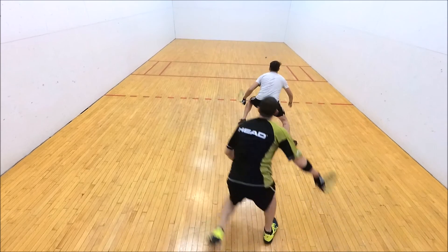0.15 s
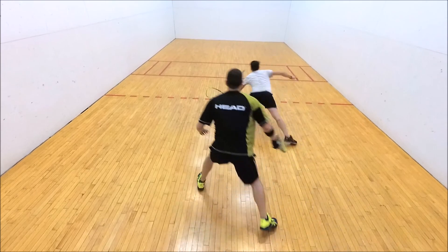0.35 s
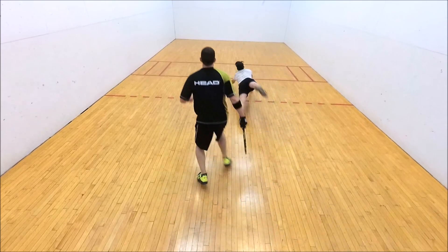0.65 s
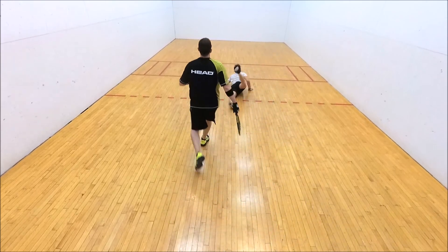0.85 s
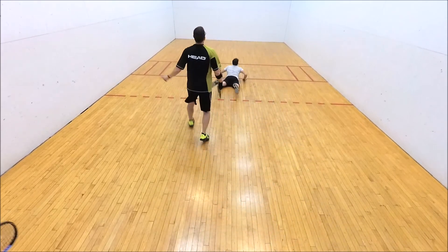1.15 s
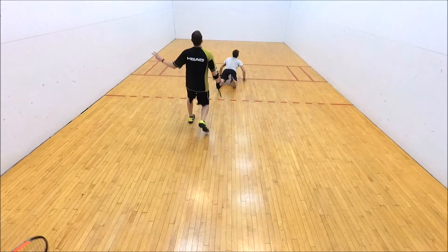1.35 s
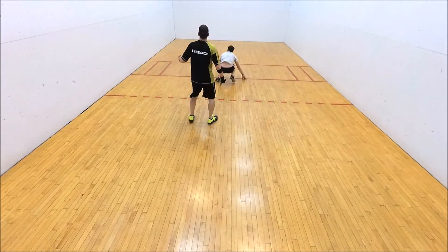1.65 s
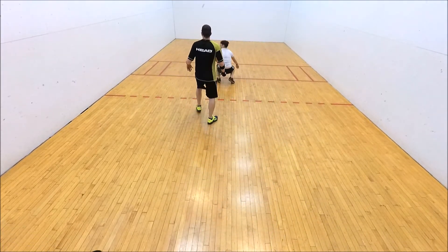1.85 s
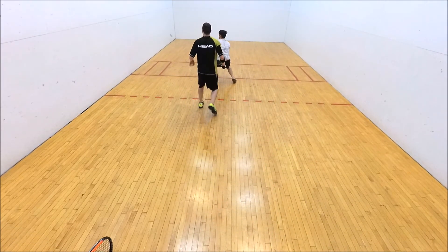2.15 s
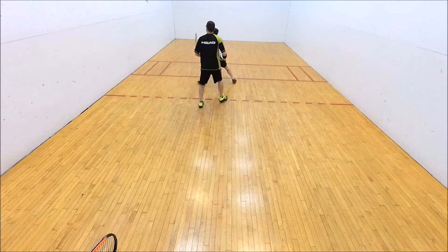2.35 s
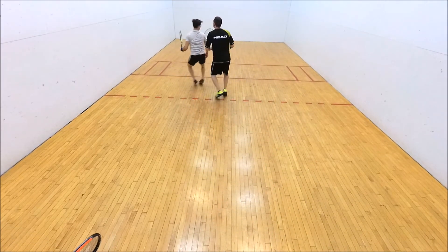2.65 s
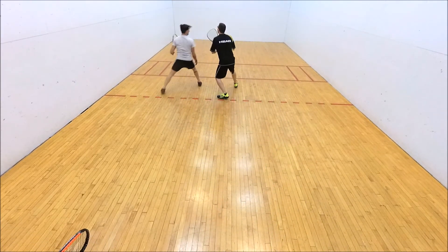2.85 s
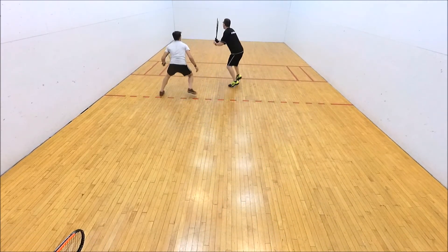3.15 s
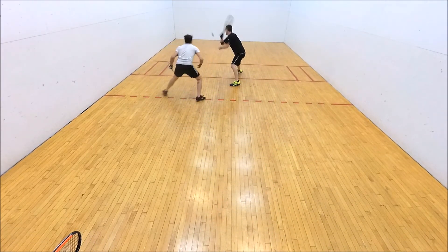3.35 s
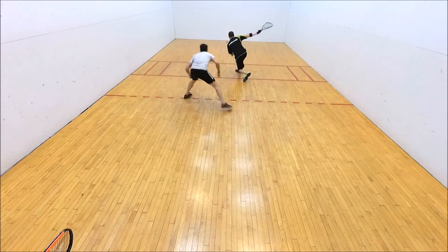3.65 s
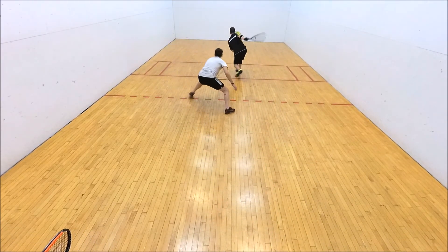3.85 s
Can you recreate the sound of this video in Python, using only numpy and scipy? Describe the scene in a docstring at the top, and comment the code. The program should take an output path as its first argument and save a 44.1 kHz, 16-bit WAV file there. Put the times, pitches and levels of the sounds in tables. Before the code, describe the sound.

A racquetball smacks off racquets and walls in an echoing court as shoes thump and scuff.

```python
"""A bare, very echoing racquetball court during a rally. Each blow of racquet, wall or floor excites
the air inside the hollow ball, which pings. Feet thump the resonant sprung floor, a diving player's
racquet chatters on the boards, and shoes scuff and squeak by friction. The microphone feeds only the
right channel and clips on the hardest hits; the left carries faint hiss."""
import sys
import numpy as np
from scipy import signal
from scipy.fft import rfft, irfft, next_fast_len
from scipy.io import wavfile
from scipy.ndimage import uniform_filter1d

SR = 44100
rng = np.random.default_rng(int(sys.argv[2]) if len(sys.argv) > 2 else 0)


def wrap_up_sound(samples):
    """Save the sound to the file named by the first command line argument, as 16-bit audio."""
    columns = np.atleast_2d(samples).T
    # keep every value between -1 and 1, then stretch to whole-number steps
    tamed = np.clip(columns, -1, 1)
    steps = np.round(tamed * 32767).astype(np.int16)
    wavfile.write(sys.argv[1], SR, steps)


N = 176400
TIME = np.arange(N) / SR
FILTER_SIZE = 16384
FREQS = np.fft.rfftfreq(FILTER_SIZE, 1 / SR)


def amp(db):
    """Decibels as an amplitude ratio."""
    return 10 ** (np.asarray(db) / 20)


def unit(x):
    """Normalisation to unit power."""
    return x / np.sqrt(np.mean(x ** 2) + 1e-20)


def along(points, hz):
    """Interpolation on a logarithmic frequency axis."""
    f, v = np.transpose(points)
    return np.interp(np.log(hz + 1), np.log(f + 1), v)


def colour(points):
    """Broadband spectral envelope, unit power."""
    return unit(amp(along(points, FREQS)))


def resonances(modes, skirt):
    """Modal superposition: resonance peaks add in power; a larger skirt steepens their flanks."""
    power = sum(amp(db) ** 2 / (1 + (2 * (FREQS - hz) / width) ** 2) ** skirt for hz, width, db in modes)
    return unit(np.sqrt(power))


def tilted(gain, slope_db, hz):
    """Spectral tilt per octave above hz, unit power."""
    return unit(gain * amp(slope_db * np.log2(np.maximum(FREQS, hz) / hz)))


def power_sum(levels_db, gains):
    """Incoherent addition: spectra add in power."""
    return np.linalg.norm(amp(levels_db)[:, None] * np.array(gains), axis=0)


def ring(x, gain):
    """Minimum-phase filtering: folding the cepstrum makes the response causal."""
    cepstrum = irfft(np.log(np.maximum(gain, 1e-6)))
    cepstrum[1:FILTER_SIZE // 2] *= 2
    cepstrum[FILTER_SIZE // 2 + 1:] = 0
    return signal.fftconvolve(x, irfft(np.exp(rfft(cepstrum))))[:len(x)]


def add(out, s, x):
    """Superposition: x joins the mix at time s."""
    i = round(s * SR)
    x, i = x[max(0, -i):], max(0, i)
    out[i:i + len(x)] += x[:N - i]


def burst(spectrum, peak_s):
    """Direct sound of an impact: a brief contact radiates broadband noise."""
    u = np.arange(FILTER_SIZE) / SR / peak_s
    return ring(rng.standard_normal(FILTER_SIZE) * u * np.exp(1 - u), colour(spectrum))


# Decay of the court (frequency [Hz], reverberation time [s])
COURT_T60 = [(50, 0.35), (120, 0.37), (330, 2.76), (900, 2.775), (2400, 2.44), (4000, 2.15), (5500, 1.65),
             (8000, 0.92), (12000, 0.56), (16000, .5)]
def court():
    """Reverberation: a fresh diffuse response builds quickly; the midrange lingers longest."""
    early_db, early_s, build_s = 0.5, 0.086, 0.0024  # first echoes stand above the diffuse decay
    hz, t, noise = signal.stft(rng.standard_normal(N), SR, nperseg=512)
    decay = amp(early_db * np.exp(-t / early_s) - 60 * t / along(COURT_T60, hz)[:, None])
    tail = signal.istft(noise * decay, SR, nperseg=512)[1][:N]
    return tail * (1 - np.exp(-TIME / build_s))


# Fixed ringing resonances, probably of the microphone housing, that colour every blow and scuff
# (frequency [Hz], bandwidth [Hz], level [dB])
HOUSING_MODES = [(1146.5, 14, -6), (1338, 56, -2.5), (1459, 77, -2.5), (1730, 160, -8), (2075, 32, -8),
                 (2375, 212, -0.5), (2823, 49, -7), (3311, 190, -1), (3660, 180, -21), (3900, 57, -3.5),
                 (4730, 87, -4), (5290, 87, -8.5)]
# Contact spectra: dull thud, mid slap, bright crack, direct snap (frequency [Hz], level [dB])
THUD_SPECTRUM = [(25, -44), (80, -7), (170, 0), (380, 1), (650, -2), (1100, 8), (3000, -33), (16000, -99)]
SLAP_SPECTRUM = [(60, -30), (240, -16.5), (340, 1), (490, 2), (640, 9), (1150, -16), (1600, 4),
                 (2800, -7.5), (3900, -4), (5300, -9.5), (7200, -18.5), (16000, -52)]
CRACK_SPECTRUM = [(200, -43), (2000, -22), (4000, 10.5), (5600, 5.5), (7400, -11), (8700, 0), (10000, -6.5),
                  (11200, -1.5), (12400, -6.5), (15000, -1.5)]
SNAP_SPECTRUM = [(200, -38), (1000, -2), (2500, -15), (3600, 8.5), (5200, -1.5), (7000, -19),
                 (15000, -24.5)]
# Blows of the ball (time [s], ping frequency [Hz], ping level [dB], swell time [s], housing ring [dB],
# ring tilt [dB/octave], thud [dB], slap [dB], crack [dB], crack tilt [dB/octave], snap [dB])
BALL_BLOWS = [(-0.012, 887.7, -7, .004, -11.5, -6.5, -43.5, -14, -19, -5, -27),
              (0.036, 916, -17.5, 0.0055, -11.5, -4.5, -29, -19.5, -29, -5, -40),
              (0.553, 891, -19, 0.014, -16.5, -3.5, -49, -23, -27.5, -6.5, -44),
              (0.622, 910, -25.5, 0.0092, -28, -2, -35, -35.5, -30, -22, -40),
              (2.145, 916, -27, 0.028, -36, -6, -43.5, -44.5, -43, 2, -50),
              (3.572, 911, -11, 0.034, -27, -7, -36, -27.5, -31, 2, -56.5),
              (3.770, 924, -10.5, 0.024, -19, -9.5, -20.5, -20.5, -27.5, 4.5, -19.5)]
def ball():
    """Cavity resonance: each impact sets the air in the ball pinging, over the noise of the contact."""
    out = np.zeros(N)
    return_s, spread_s = .068, .008  # the ping peaks as the far wall returns it
    far_wall = 1 + .45 * np.exp(-.5 * ((TIME - return_s) / spread_s) ** 2)
    housing_ring = resonances(HOUSING_MODES, skirt=1.6)
    thud, slap, crack = colour(THUD_SPECTRUM), colour(SLAP_SPECTRUM), colour(CRACK_SPECTRUM)
    ping_width_hz = 78
    pock_hz, pock_width_hz, pock_db, pock_s = 975, 505, -6.5, 0.19  # the squashed ball's broad pock
    pock = resonances([(pock_hz, pock_width_hz, 0)], skirt=2.26)
    for s, hz, ping_db, swell_s, housing_db, tilt, *contact_db, crack_tilt, snap_db in BALL_BLOWS:
        parts = [tilted(housing_ring, tilt, hz), thud, slap, tilted(crack, crack_tilt, hz=6000)]
        add(out, s, ring(court(), power_sum([housing_db, *contact_db], parts)))
        ping = ring(court(), resonances([(hz, ping_width_hz, 0)], skirt=1.55))
        ping += amp(pock_db) * np.exp(-TIME / pock_s) * ring(court(), pock)
        swell = 1 - np.exp(-(TIME / swell_s) ** 2)
        add(out, s, amp(ping_db) * ping * far_wall * swell)
        add(out, s, amp(snap_db) * burst(SNAP_SPECTRUM, peak_s=.009))
    return out


# Spectra of the court's hush and the left channel's hiss (frequency [Hz], level [dB])
HUSH_SPECTRUM = [(25, -22), (85, -8), (130, -4.5), (300, -5.5), (700, 0), (2000, 2), (5000, -13.5),
                 (7500, -18), (10000, -11.5), (12000, -15), (15000, -18.5)]
HISS_SPECTRUM = [(25, -2), (100, -12), (500, -4), (1000, -4.5), (2000, -5), (4000, -6.5), (8000, -10),
                 (15000, -10)]
def noise_floor(spectrum, db):
    """Stationary noise: a steady background with a fixed spectrum."""
    return amp(db) * ring(rng.standard_normal(N), colour(spectrum))


# Modes of the sprung floor (frequency [Hz], bandwidth [Hz], level [dB])
FLOOR_MODES = [(88.4, 9.6, 1), (156.4, 25, -6.5), (203, 44, -13.5)]
# Footfalls (time [s], level [dB])
FOOTFALLS = [(0.002, -32), (0.764, -36), (0.988, -46), (1.208, -43), (1.35, -47), (1.748, -50),
             (1.878, -46.5), (2.42, -53.5), (2.899, -53), (3.002, -58.5), (3.298, -52), (3.8, -34.5)]
def footfalls():
    """Impulse excitation: each step sets the low modes of the sprung floor booming."""
    out = np.zeros(N)
    boom = resonances(FLOOR_MODES, skirt=1.43)
    for s, db in FOOTFALLS:
        add(out, s, amp(db) * ring(court(), boom))
    return out


# Spectra of the rim's tick and the frame's clack (frequency [Hz], level [dB])
RIM_SPECTRUM = [(500, -30), (4000, -14), (5500, -9), (7300, -11), (8600, 1), (9900, -3), (11200, 1),
                (12400, -2), (13600, 0), (15500, -2)]
CLACK_SPECTRUM = [(500, -16), (2800, -10), (3850, 9), (4500, -11), (5400, -12), (7300, -25), (9000, -18),
                  (15000, -19)]
# Modes of the racquet frame (frequency [Hz], bandwidth [Hz], level [dB])
FRAME_MODES = [(889, 55, 7), (1435, 140, -1.5), (1704, 100, 1.5), (2060, 116, -1), (2384, 180, 2),
               (3270, 160, -3), (3610, 170, -5.5), (3880, 155, 2), (4830, 100, -9.5), (5300, 370, -9.5)]
# Rim skipping on the boards (time [s], reverberant level [dB], direct level [dB])
RIM_SKIPS = [(1.084, -29.5, -25), (1.092, -30.5, -19), (1.1, -41, -18), (1.107, -36, -14),
             (1.139, -35.5, -22), (1.331, -57, -37), (1.698, -50, -37)]
# Frame knocking on the floor (time [s], ring [dB], crack [dB], thud [dB])
FRAME_KNOCKS = [(1.331, -23.5, -27, -33), (1.385, -28, -37, -45.5), (1.666, -28, -38, -39)]
# Frame rattling as it lands (time [s], level [dB])
FRAME_RATTLE = [(1.333, -22), (1.345, -26), (1.355, -20)]
def racquet():
    """Repeated impact: the rim skips in bright ticks, then the frame lands, rattles and rings."""
    out = np.zeros(N)
    for s, echo_db, tick_db in RIM_SKIPS:
        add(out, s, amp(echo_db) * ring(court(), colour(RIM_SPECTRUM)))
        add(out, s, amp(tick_db) * burst(RIM_SPECTRUM, peak_s=.0012))
    parts = [resonances(FRAME_MODES, skirt=1.3), colour(CRACK_SPECTRUM), colour(THUD_SPECTRUM)]
    for s, *levels_db in FRAME_KNOCKS:
        add(out, s, ring(court(), power_sum(levels_db, parts)))
    for s, db in FRAME_RATTLE:
        add(out, s, amp(db) * burst(CLACK_SPECTRUM, peak_s=.0018))
    return out


# Spectrum of a rubbing sole (frequency [Hz], level [dB])
RUB_SPECTRUM = [(100, -9), (400, 6.5), (1000, -3), (2400, -4.5), (4000, 4.5), (7000, -14.5), (15000, -35)]
# Scuffs (time [s], chirp level [dB], rub level [dB])
SOLE_SCUFFS = [(2.872, -35.5, -48), (2.96, -44, -44.5), (3.03, -65, -49), (3.312, -38, -41),
               (3.44, -64, -39.5)]
def scuffs():
    """Sliding friction: a turning sole gives a broadband rub and a short low chirp."""
    out = np.zeros(N)
    sole_hz, sole_width_hz, chirp_s = 671.4, 100, .052
    rub = unit(power_sum([0, 3], [colour(RUB_SPECTRUM), resonances(HOUSING_MODES, skirt=1.6)]))
    sole = resonances([(sole_hz, sole_width_hz, 0)], skirt=1.15)
    chirp = np.sin(2 * np.pi * sole_hz * TIME) * np.sin(np.pi * np.minimum(TIME / chirp_s, 1))
    onset_accent = amp(5 * (np.exp(-(TIME / .025) ** 2) - 1.5))  # the echo starts 5 dB above its tail
    for s, chirp_db, rub_db in SOLE_SCUFFS:
        add(out, s, ring(onset_accent * court(), power_sum([chirp_db - 2.5, rub_db], [sole, rub])))
        add(out, s, amp(chirp_db) * chirp)
    return out


# Course of the squeak (time [s], frequency [Hz], relative level [dB])
SQUEAK_CONTOUR = [(3.124, 6250, -52), (3.133, 6270, -38), (3.146, 6190, -39), (3.16, 5890, -32),
                  (3.17, 6210, -38.5), (3.185, 6140, -69)]
def squeak():
    """Stick-slip oscillation: a sole sings at a high, unsteady pitch, and the court holds the note."""
    s, hz, db = np.transpose(SQUEAK_CONTOUR)
    jitter = .032 * unit(uniform_filter1d(rng.standard_normal(N), size=50))
    phase = 2 * np.pi * np.cumsum(np.interp(TIME, s, hz) * (1 + jitter)) / SR
    envelope = amp(np.interp(TIME, s, db)) * (TIME > s[0]) * (TIME < s[-1])
    tone = envelope * (np.sin(phase) + amp(-9) * np.sin(2 * phase))
    response = court()
    echo = signal.fftconvolve(tone, response / np.linalg.norm(response))[:N]
    return amp(1) * tone + amp(2) * echo


def scene():
    """Linear superposition: the court's sounds sum on the right channel; the left is bare hiss."""
    hush = noise_floor(HUSH_SPECTRUM, db=-46.5)
    hiss = noise_floor(HISS_SPECTRUM, db=-60.5)
    return np.array([hiss, ball() + hush + footfalls() + racquet() + scuffs() + squeak()])


def record(dry):
    """Saturation and band limiting: peaks clip near full scale, then the highest treble is cut."""
    knee, cutoff_hz = 8, 15500
    clipped = dry / (1 + np.abs(dry) ** knee) ** (1 / knee)
    size = next_fast_len(N + FILTER_SIZE)
    passband = np.fft.rfftfreq(size, 1 / SR) < cutoff_hz
    return irfft(rfft(clipped, size) * passband, size)[:, :N]


dry = scene()
out = record(dry)
wrap_up_sound(out)
```